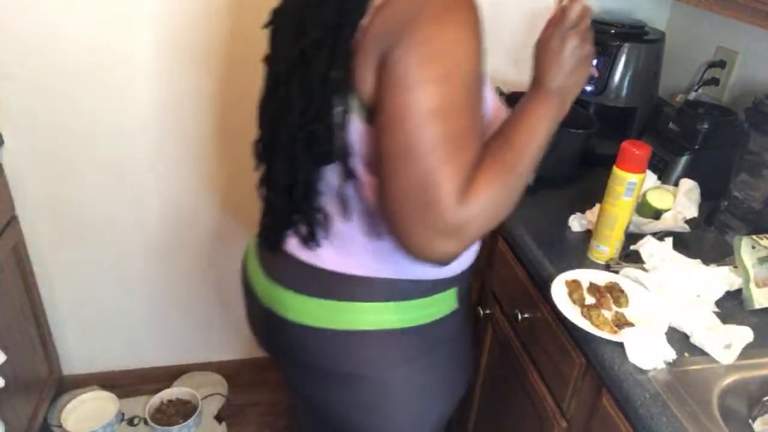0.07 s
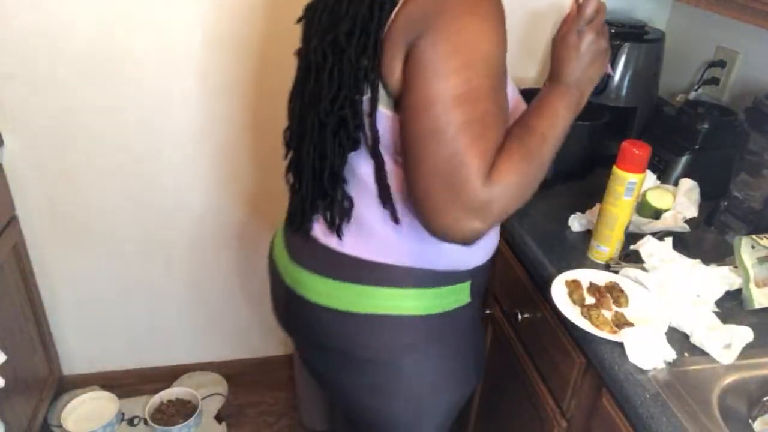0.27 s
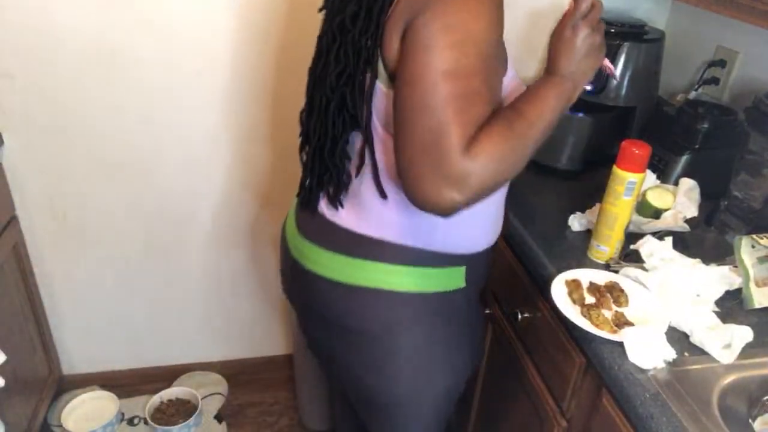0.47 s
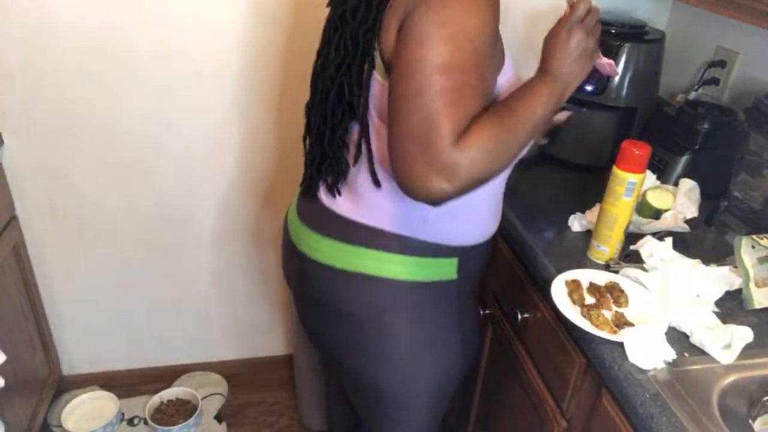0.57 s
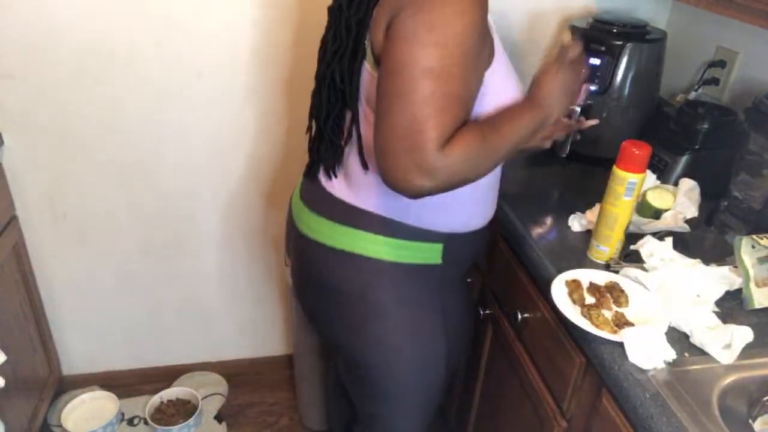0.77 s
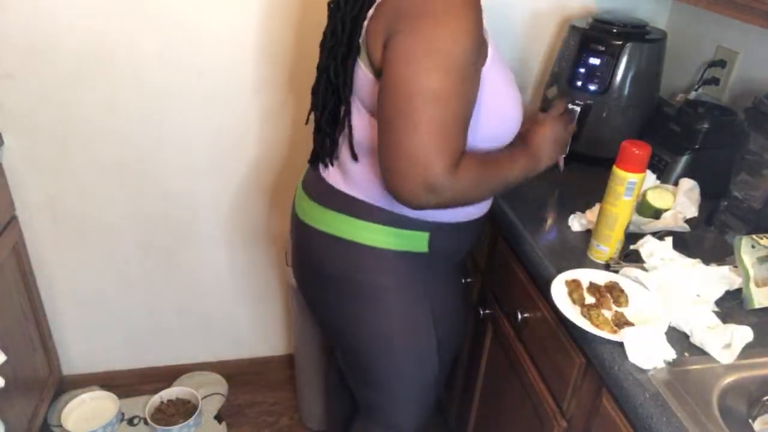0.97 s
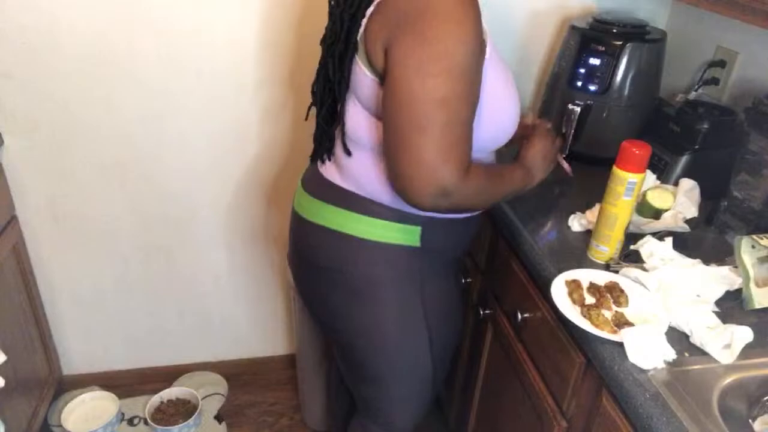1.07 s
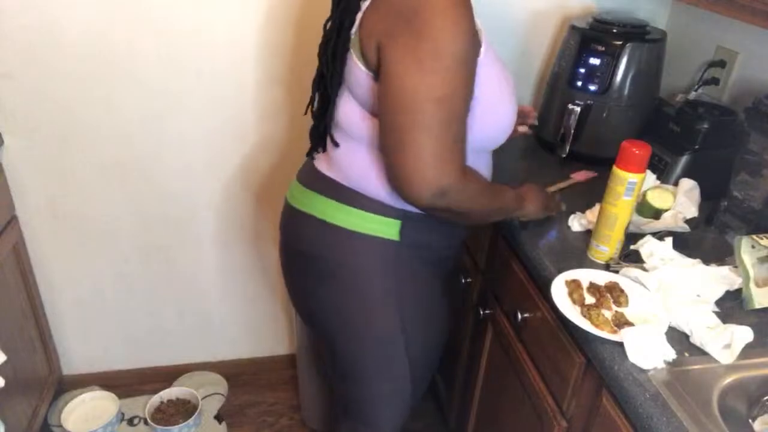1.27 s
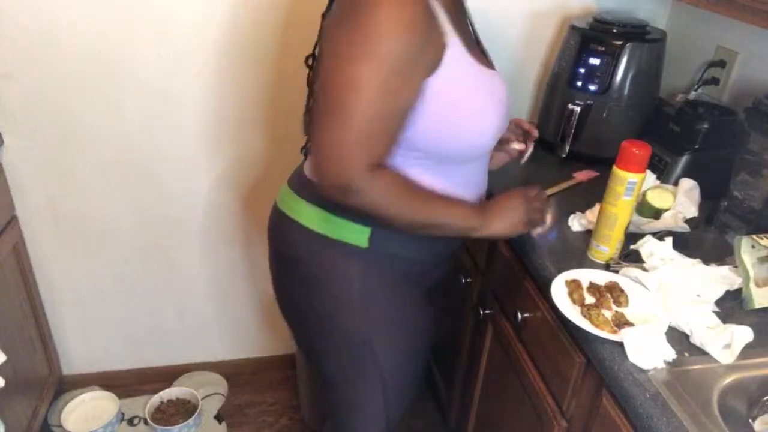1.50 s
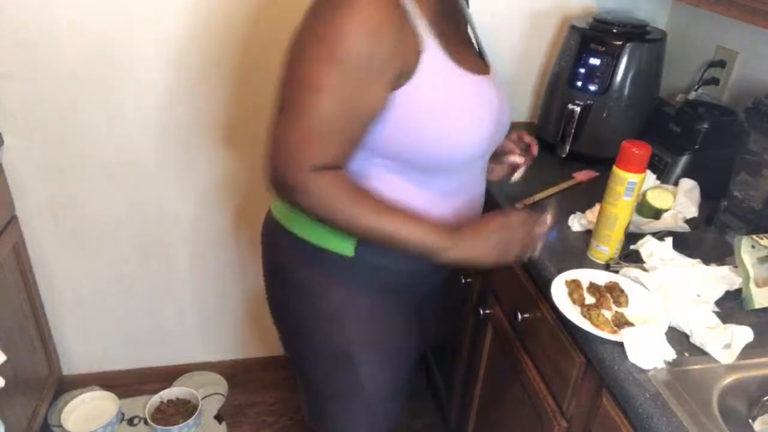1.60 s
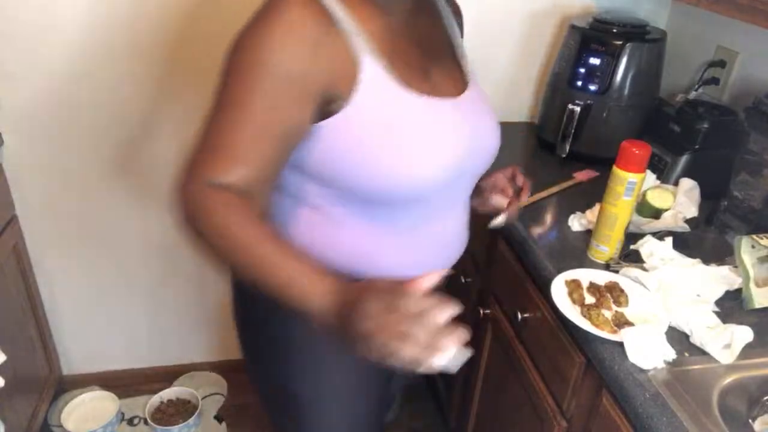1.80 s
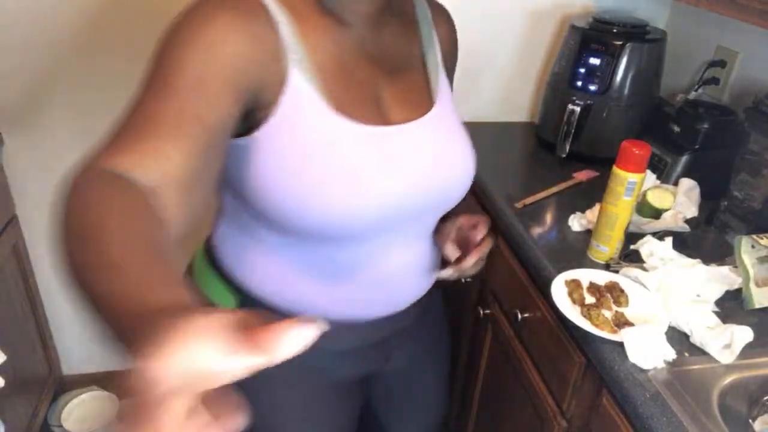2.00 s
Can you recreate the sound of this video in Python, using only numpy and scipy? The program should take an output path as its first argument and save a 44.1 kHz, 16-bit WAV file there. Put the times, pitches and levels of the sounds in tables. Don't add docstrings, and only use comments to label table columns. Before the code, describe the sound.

A metal basket slides into a counter-top air fryer in a small kitchen. Light knocks and a short scrape come at 0.1-0.3 s, then denser rattling and gritty rubbing from 0.4 s, peaking in hollow, boomy clunks near 0.7 s and settling by 0.8 s. A small bright latch click falls at 1.24 s. Throughout, a low fan hum rises slightly, its airy noise dulling as the basket closes.

```python
import sys
import numpy as np
from scipy import signal
from scipy.fft import rfft, irfft
from scipy.io import wavfile
from scipy.ndimage import uniform_filter1d

SR = 44100
rng = np.random.default_rng(int(sys.argv[2]) if len(sys.argv) > 2 else 0)


def boost_factor(decibels):
    exponent = np.asarray(decibels, float) / 20
    return 10 ** exponent


def wav_record(signal):
    frames = np.transpose(np.atleast_2d(signal))
    bounded = np.clip(frames, -1, 1)
    quanta = np.round(bounded * 32767).astype(np.int16)
    wavfile.write(sys.argv[1], SR, quanta)


N = 90404

# pitch_hz [Hz], level_db [dB], t60_s [s]
HOUSING_MODES = [(195.8, -5.5, .17), (248.8, 0.5, 0.12), (273.1, -9.5, 0.15)]


def unit(x):
    return x / np.sqrt(np.mean(x ** 2))


def shape(x, gain):
    hz = np.arange(len(x) // 2 + 1) * SR / len(x) + 1
    return irfft(rfft(x) * gain(hz), len(x))


def colour(points):
    hz, db = np.array(points, float).T
    return unit(shape(rng.standard_normal(N), lambda f: boost_factor(np.interp(np.log(f), np.log(hz), db, right=-80))))


def fade(t60_s, size=SR // 2):
    return np.exp(-np.log(1000) * np.arange(size) / SR / max(t60_s, .002))


def ring(modes, scatter_db=0.):
    t = np.arange(SR // 2) / SR
    out = np.zeros(len(t))
    for k, (hz, db, t60_s) in enumerate(modes):
        sign = (-1) ** (k * (hz > 300))
        level = boost_factor(db + scatter_db * rng.standard_normal())
        out += sign * level * fade(t60_s) * np.sin(2 * np.pi * hz * t)
    return out


def walk(rate_hz):
    hold = int(SR / rate_hz)
    steps = np.repeat(rng.standard_normal(N // hold + 1), hold)
    return unit(uniform_filter1d(uniform_filter1d(steps, hold), hold)[:N])


def add(out, x, at_s):
    i = int(at_s * SR)
    out[i:i + len(x)] += x[:N - i]


def push(contact_ms):
    force = np.hanning(max(int(contact_ms * SR / 1000), 3))
    return force / force.sum()


def basket(t):
    cracks = np.zeros(N)
    body = knocks(cracks) + slide_rumble(t)
    # pitch_hz [Hz], level_db [dB per Hz]
    crack_tone = [(880, 5), (1500, -4.5), (2310, -8.5), (3650, -11.5), (5890, -18.5), (7520, -19.5),
                  (15500, -29.5)]
    body = signal.sosfilt(signal.butter(4, 145, "high", fs=SR, output="sos"), body)
    return body + cracks * colour(crack_tone) + slide_rub(t)


def knocks(cracks):
    # start_s [s], housing_db [dB], shell_db [dB], crack_db [dB], struck_hz [Hz] (favoured modes)
    hits = [(.015, -54, -41, -53, 800), (.07, -60, -42, -73, 380), (0.11, -49, -52, -79, 400),
            (.139, -60, -42, -60, 424), (.148, -53, -29, -43, 950), (.206, -14, -33, -49, 644),
            (.234, -22.5, -31.5, -47, 700), (0.25, -54, -34, -46, 600), (0.305, -72, -34.5, -63, 400),
            (.326, -68, -34, -48, 925), (0.398, -46, -64, -44.5, 600), (.424, -53, -36, -30, 615),
            (.43, -35, -22, -46, 460), (.441, -25, -17.5, -29.5, 680), (.446, -41, -17.5, -40.5, 980),
            (.452, -13.5, -27, -37.5, 915), (.468, -32, -31, -45, 500), (.499, -32, -25, -39.5, 390),
            (0.544, -18.5, -21.5, -30.5, 414), (.552, -36, -17, -41.5, 765), (.572, -26, -25, -43, 413),
            (.585, -37, -32, -48, 754), (.5945, -9.5, -15, -33, 617), (.612, -13.5, -21, -38, 795),
            (.624, -33, -15.5, -36, 626), (.647, -15.5, -24, -32, 500), (.666, -6.5, -32, -44, 750),
            (.684, -10, -10, -50, 608), (.696, -4.5, -9.5, -43, 400), (0.701, -9.5, -14.5, -40, 1430),
            (0.713, -18.5, -20.5, -58, 400), (.766, -18.5, -30, -47, 587), (.792, -28.5, -33, -60, 600),
            (.811, -30.5, -37, -67, 500), (1.236, -45, -31, -36, 1110), (1.243, -50, -30, -63, 467),
            (1.262, -32, -35, -69, 384), (1.301, -65, -60, -46, 606), (1.351, -54.5, -75, -45.5, 595)]
    boom_lead_s = 0.0023
    crack = fade(.07) * (1 - fade(0.0051))
    out = np.zeros(N)
    for at, boom_db, shell_db, crack_db, struck_hz in hits:
        boom = signal.fftconvolve(housing(at), push(3.0))
        rattle = signal.fftconvolve(shell(struck_hz=struck_hz), push(.6))
        add(out, -boost_factor(boom_db) * boom, at - boom_lead_s)
        add(out, boost_factor(shell_db) * rattle, at)
        add(cracks, boost_factor(crack_db) * crack, at)
    return out


def slide_envelopes(t):
    # start_s [s], rumble_db [dB], rub_db [dB]
    slide = [
        (0.129, -50, -82),
        (.16, -47, -58.5),
        (0.211, -35.5, -53),
        (.29, -52.5, -76),
        (.41, -53, -64),
        (0.448, -37, -64),
        (.53, -35.5, -49.5),
        (0.619, -29, -54.5),
        (0.709, -30, -49),
        (0.803, -43, -81),
    ]
    at, rumble_db, rub_db = np.array(slide, float).T
    return [np.interp(t, at, db, left=-99, right=-99) for db in (rumble_db, rub_db)]


def slide_rumble(t):
    slips_per_s, spread_db = 3000, 1.5
    happens = rng.random(N) < slips_per_s / SR
    slips = happens * boost_factor(spread_db * rng.exponential(size=N)) * rng.standard_normal(N)
    metal = shell(damping=0.44) + boost_factor(-8) * ring(HOUSING_MODES)
    body = signal.fftconvolve(metal, push(0.42))
    return unit(signal.fftconvolve(slips, body)[:N]) * boost_factor(slide_envelopes(t)[0])


def slide_rub(t):
    # pitch_hz [Hz], level_db [dB per Hz]
    rub_tone = [(1060, -37), (1800, -5), (2650, -16), (2820, -16), (3060, -15.5), (7140, -25), (8320, -21),
                (15500, -31.5)]
    grit_db = 3.5 * walk(150.1)
    return boost_factor(slide_envelopes(t)[1] + grit_db) * colour(rub_tone)


def housing(at_s):
    # start_s [s], level_db [dB]
    seating = [
        (.2, -16),
        (.6, -9),
        (.69, 0),
    ]
    (hz, db, t60_s), *rest = HOUSING_MODES
    lowest = (hz, db + np.interp(at_s, *np.array(seating).T), t60_s)
    return ring([lowest] + rest) * (1 - fade(0.023))


def shell(damping=0.91, struck_hz=None):
    # pitch_hz [Hz], level_db [dB], t60_s [s]
    shell_modes = [(368.6, -3.5, 0.14), (399.6, -1.5, 0.11), (461, -10.5, 0.23), (492.6, -8, 0.085),
                   (587, -1, 0.057), (632, -7, 0.063), (662, -6, 0.079), (757, -6, 0.067),
                   (870, -5.5, 0.061), (1012, -5.5, 0.047), (1093, -6, 0.035), (1390, -8, 0.027),
                   (1800, -17, 0.0092)]
    flex, struck_octaves, rest_db = .008, 0.29, -13
    touched = []
    for hz, db, t60_s in shell_modes:
        if struck_hz is not None:
            distance = np.log2(hz / struck_hz) / struck_octaves
            db = db + rest_db * (1 - np.exp(-distance ** 2))
        touched.append((hz * (1 + flex * rng.standard_normal()), db, t60_s * damping))
    return ring(touched, scatter_db=2.5)


def thuds():
    # start_s [s], pitch_hz [Hz], level_db [dB]
    jolts = [(.148, 157.6, -24.5), (0.506, 140, -30), (.25, 70, -38), (0.429, 139, -22.5), (0.494, 71, -38),
             (0.639, 102, -28.5), (0.689, 81, -30), (.7, 163, -16), (.83, 123.7, -29.5)]
    t60_s, rise_s, contact_ms = 0.17, 0.079, 4.7
    out = np.zeros(N)
    for at, hz, db in jolts:
        note = ring([(hz, db, t60_s)]) * (1 - fade(rise_s))
        add(out, signal.fftconvolve(note, push(contact_ms)), at)
    return out


def ticks():
    # start_s [s], pitch_hz [Hz], level_db [dB]
    pings = [(.147, 1844, -44), (.326, 2700, -54.5), (.424, 2500, -48), (0.4412, 4130, -57),
             (.5462, 3300, -39.5), (.5462, 3674, -33), (0.597, 3160, -42), (0.623, 2470, -43),
             (.647, 2010, -36), (.698, 393, -19.5), (0.697, 1693, -32), (1.235, 1082, -44.5),
             (1.236, 2930, -46.5)]
    out = np.zeros(N)
    for at, hz, db in pings:
        t60_s = 75 / hz ** 1.003
        add(out, ring([(hz, db, t60_s)]), at)
    return out


def latch():
    # start_s [s], level_db [dB]
    clicks = [
        (1.235, -37),
        (1.237, -45),
        (1.246, -48),
        (1.25, -49),
    ]
    # pitch_hz [Hz], level_db [dB per Hz]
    click_tone = [(600, -32), (1000, -2), (2500, -18), (3000, -11), (3700, -17), (5400, -9.5),
                  (7200, -11.5), (8700, -5), (15500, -16)]
    # pitch_hz [Hz], level_db [dB], t60_s [s]
    latch_modes = [(2900, -5, 0.04), (4370, 1, 0.026), (5470, -8, 0.027), (6470, -8, .04), (7330, -8, .05),
                   (8360, -6, .09), (9000, -6, 0.14), (10800, 0, 0.044)]
    burst_t60_s, tail_t60_s = 0.021, 0.33
    tail_db, ring_db, tail_top_hz = -15.5, -5.5, 10200
    burst, tail, metal = np.zeros(N), np.zeros(N), np.zeros(N)
    for at, db in clicks:
        add(burst, boost_factor(db) * fade(burst_t60_s), at)
        add(tail, boost_factor(db + tail_db) * fade(tail_t60_s), at)
        add(metal, boost_factor(db + ring_db) * ring(latch_modes, scatter_db=0.5), at)
    noise = colour(click_tone)
    dull = shape(noise, lambda f: 1 / (1 + (f / tail_top_hz) ** 8))
    return metal + burst * noise + tail * dull


def fan(t):
    # start_s [s], shaft_hz [turns per s], opening [0-1]
    run = [
        (0, 46.88, 0.9),
        (0.403, 47.16, 0.82),
        (0.852, 48.26, 0.23),
        (1.208, 49.49, 0.08),
        (1.6, 51.33, 0.09),
        (2.05, 51.8, 0.11),
    ]
    at, shaft_hz, opening = np.array(run, float).T
    return fan_tones(t, np.interp(t, at, shaft_hz)) + fan_air(np.interp(t, at, opening))


def fan_tones(t, shaft_hz):
    # blade_count [per turn], level_db [dB]
    blades = [(6, -42), (11, -58)]
    null_hz, null_width_hz, null_db = 552, 9, -10
    phase = 2 * np.pi * np.cumsum(shaft_hz) / SR
    hum = boost_factor(-56 + 2.6 * walk(6.59)) * np.sin(2 * np.pi * 121.9 * t)
    tones = hum
    for count, db in blades:
        dip_db = null_db * np.exp(-((count * shaft_hz - null_hz) / null_width_hz) ** 2)
        tones = tones + boost_factor(db + dip_db + 0.46 * walk(9.94)) * np.sin(round(count) * phase)
    return np.sqrt(2) * tones


def fan_air(opening):
    # pitch_hz [Hz], level_db [dB per Hz]
    air_tone = [(24, -66), (40, -19.5), (275, 1), (307, -13), (342, -9), (566, -23.5), (674, -18.5),
                (2110, -33), (7500, -52), (9750, -90), (16500, -120)]
    # pitch_hz [Hz], width_hz [Hz], closed_db [dB], open_change_db [dB]
    air_peaks = [(192, 29, -45.5, -11.5), (241, 25, -46, -16), (400, 100, -60.5, 15.5),
                 (500, 104, -65, 14.5), (2120, 86, -66.5, -16), (3910, 340, -74.5, -16)]
    air = boost_factor(-43) * colour(air_tone)
    high = shape(air, lambda f: 1 / np.sqrt(1 + (378 / f) ** 4))
    air = air + high * (boost_factor(7 * opening + 1.2 * walk(4.67)) - 1)
    low = shape(air, lambda f: 1 / (1 + (f / 237) ** 6))
    air = air + low * (boost_factor(-3.5 * opening) - 1)
    for hz, width_hz, db, open_db in air_peaks:
        peak = shape(rng.standard_normal(N), lambda f: 1 / (1 + (2 * (f - hz) / width_hz) ** 2))
        air = air + boost_factor(db + open_db * opening + 0.5 * walk(4.1)) * unit(peak)
    return air


def room(x):
    size = SR // 2
    noise = np.sign(rng.standard_normal(size)) * (np.arange(size) > 120)
    low = shape(noise, lambda f: 1 / (1 + (f / 8000) ** 2))
    tail = low * fade(.22) + (noise - low) * fade(.19)
    tail = shape(tail, lambda f: 1 / np.sqrt(1 + (520 / f) ** 6))
    tail = tail / np.sqrt(np.sum(tail ** 2))
    return x + boost_factor(-6) * signal.fftconvolve(x, tail)[:N]


def scene():
    t = np.arange(N) / SR
    reverberant = room(basket(t) + ticks() + latch())
    return (reverberant + thuds() + fan(t))[None]


def low_pass(x):
    return signal.sosfilt(signal.butter(12, 15880, fs=SR, output="sos"), x)


def record(dry):
    hiss_hz, hiss_db, tilt_db = 7920, -75, -7.5
    hiss = unit(shape(rng.standard_normal(N), lambda f: (f > hiss_hz) * boost_factor(tilt_db * np.log2(f / 8000))))
    thin = signal.sosfilt(signal.butter(4, 45, "high", fs=SR, output="sos"), dry)
    return low_pass(thin + boost_factor(hiss_db) * hiss)


dry = scene()
out = record(dry)
wav_record(out)
```